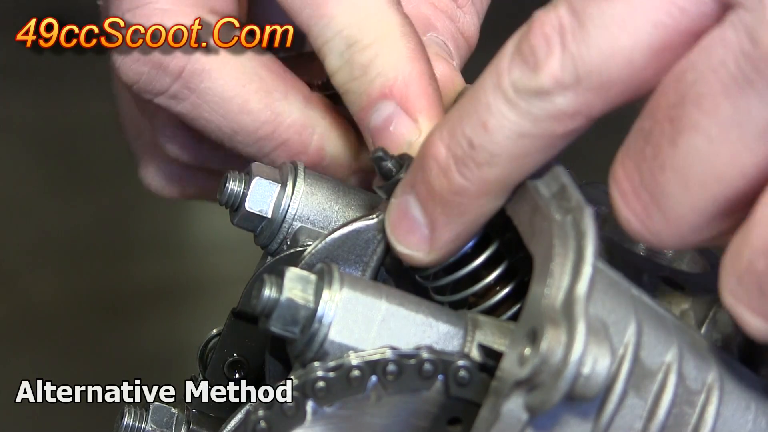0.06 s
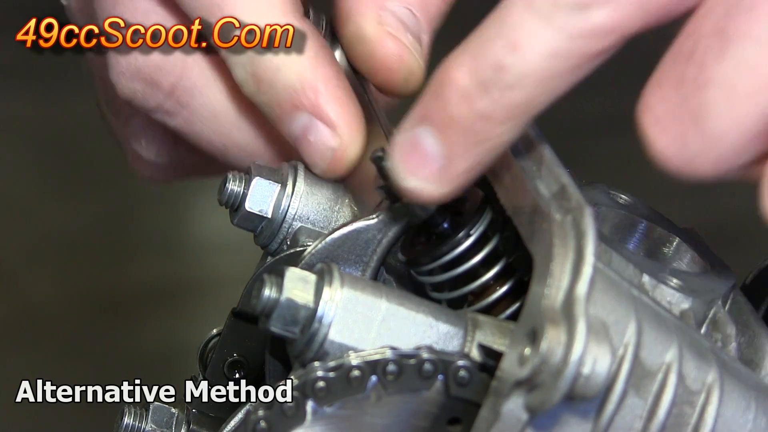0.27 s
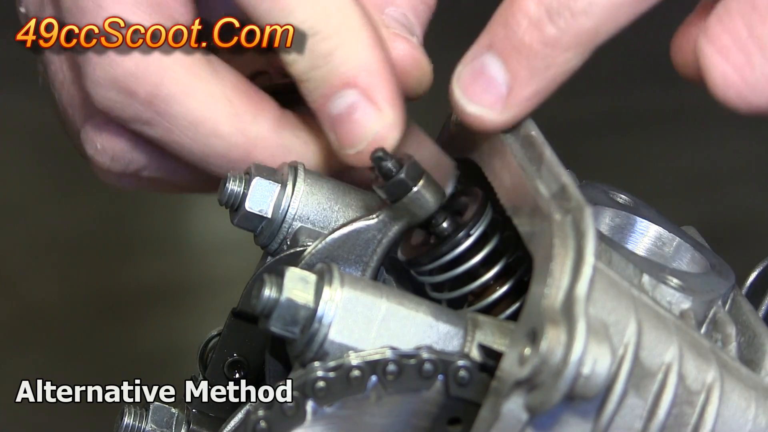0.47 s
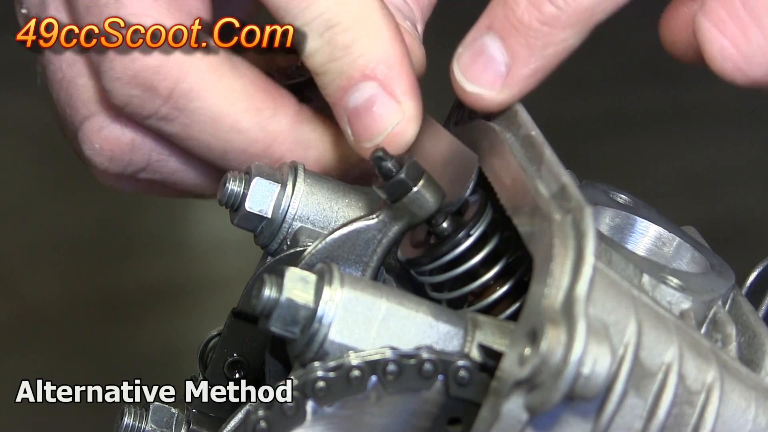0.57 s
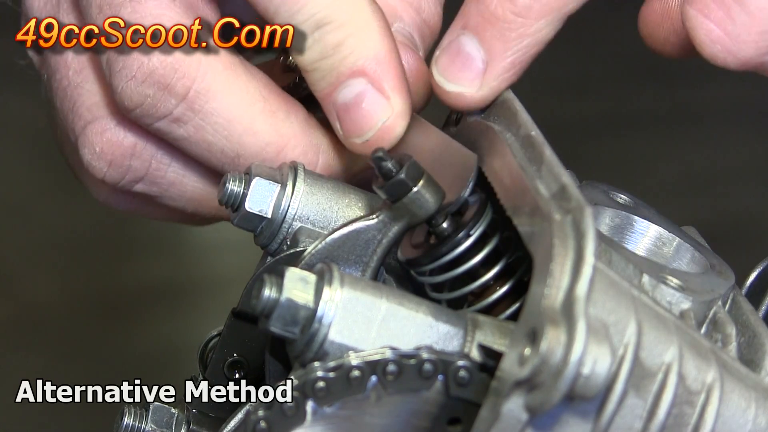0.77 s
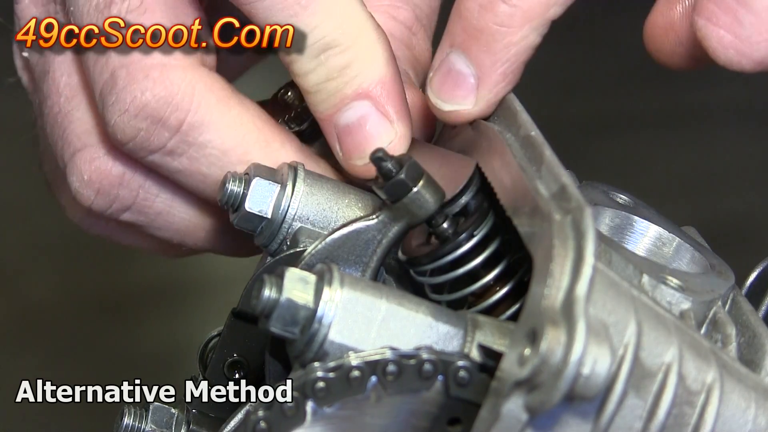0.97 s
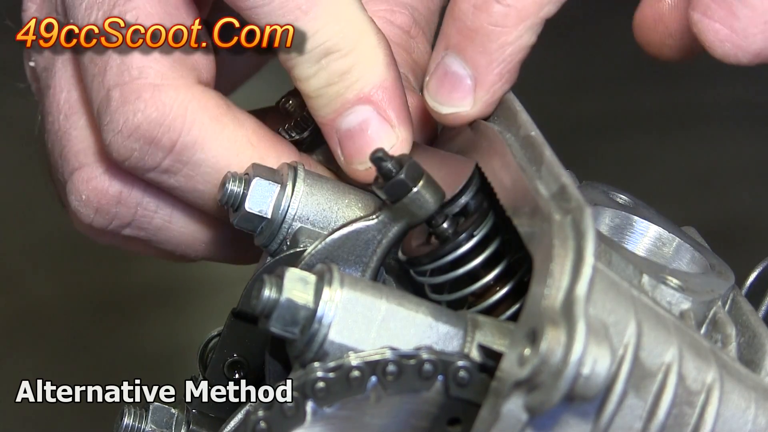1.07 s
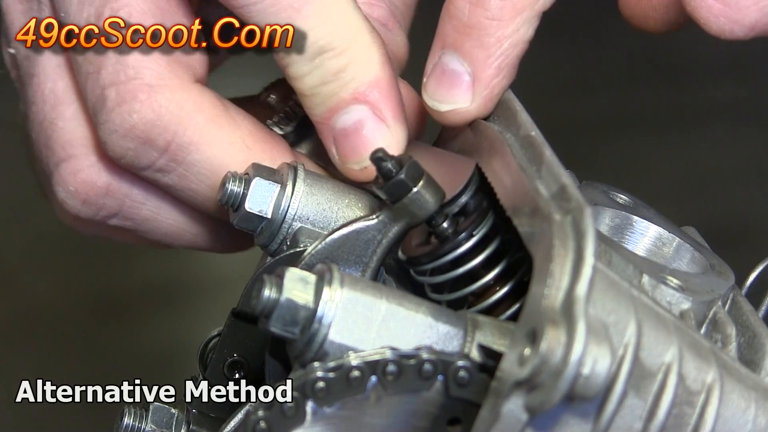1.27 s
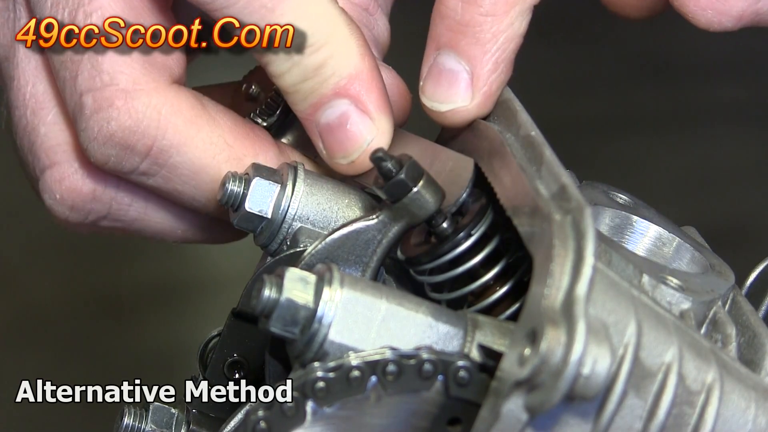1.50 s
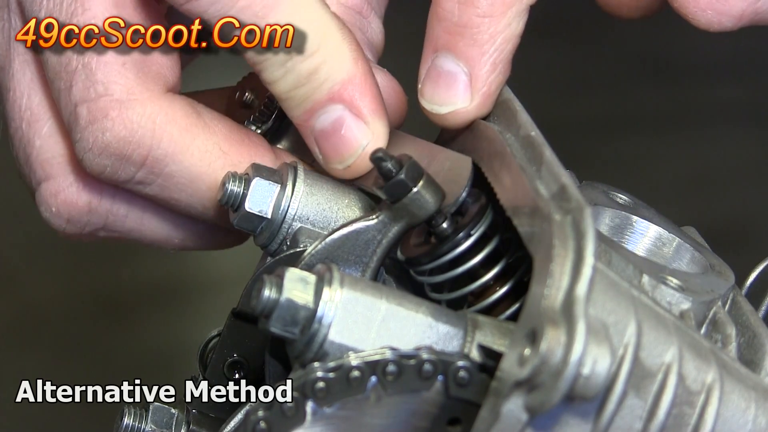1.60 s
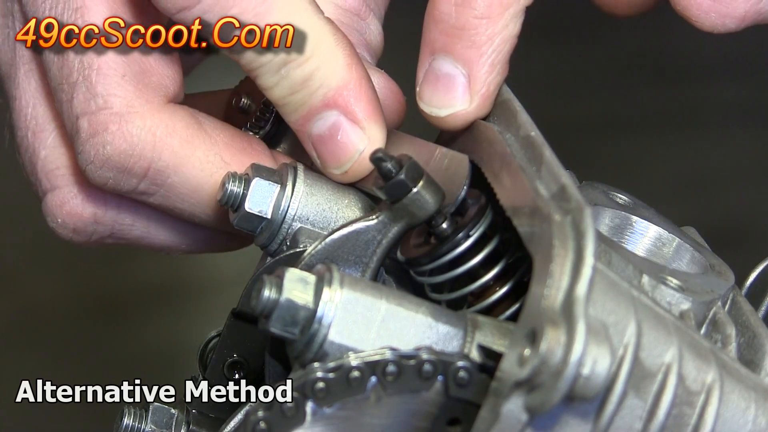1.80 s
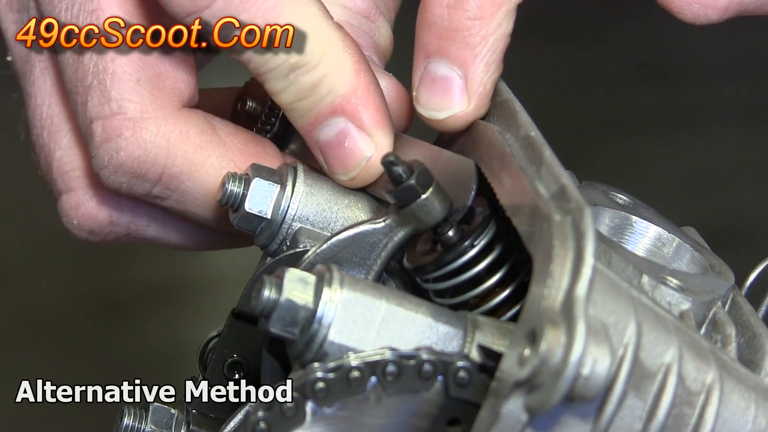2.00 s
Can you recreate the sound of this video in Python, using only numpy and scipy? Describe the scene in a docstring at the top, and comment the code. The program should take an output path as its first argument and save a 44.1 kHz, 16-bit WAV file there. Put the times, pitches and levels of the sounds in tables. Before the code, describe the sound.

Steel gauge blades click against a small engine's rocker arm: one loud clack early, faint scrapes and soft bench thuds, a light tick cluster, then a sharp bright click; close microphone, quiet room with low hum.

```python
"""Steel gauge blades click and scrape against the rocker arm of a small engine head in a quiet workshop.
Mains-fed motor hum (wavering tones) and air noise (shaped noise) run throughout. From 0.21 s come groups of
contacts, each a chatter of tiny slips that excites the modes of casting, head, rocker arm, valve stem, spring
cap and blade. Decaying tones ring on after some, and a diffuse noise tail of the room follows the contacts.
The valve spring twangs once at 0.225 s; the bench thuds softly, as decaying tones, from 0.255 to 0.625 s."""
import sys
import numpy as np
from scipy import signal
from scipy.io import wavfile
from scipy.ndimage import uniform_filter1d

SR = 44100
rng = np.random.default_rng(int(sys.argv[2]) if len(sys.argv) > 2 else 0)


def store_pcm(level_fs):
    """Save levels as 16-bit WAV."""
    pcm = np.round(np.clip(level_fs, -1, 1) * 32767).astype(np.int16)
    wavfile.write(sys.argv[1], SR, np.atleast_2d(pcm).T)


def volts_from_db(level):
    """Convert decibel levels to linear amplitude ratios."""
    exponent = np.asarray(level, float) / 20
    return 10 ** exponent


N = 90404  # samples


def read(points, hz):
    """Spectral interpolation: reads a table linearly along log frequency."""
    f, value = np.transpose(points)
    return np.interp(np.log(hz + 1), np.log(f + 1), value)


def add(mix, s, sound):
    """Linear superposition: adds a sound to the mix from time s on."""
    part = mix[round(s * SR):][:len(sound)]
    part += sound[:len(part)]


# Hum lines: f/Hz, level/dB
HUM_LINES = [(58.5, -64.5), (116, -66), (203, -76)]
# Bandwidth of the wavering of each line: width/Hz
HUM_WIDTHS = [3.8, 8.6, 24]


def hum():
    """Narrow-band modulation: each motor hum line is a steady tone with sidebands of narrow noise."""
    t = np.arange(N) / SR
    out = np.zeros(N)
    for (hz, db), width in zip(HUM_LINES, HUM_WIDTHS):
        pole = np.exp(-np.pi * width / SR)
        noise = rng.standard_normal(2 * N) + 1j * rng.standard_normal(2 * N)
        waver = signal.lfilter([1], [1, -2 * pole, pole * pole], noise)[N:]  # the filter has settled
        envelope = 1 + .5 * waver / np.sqrt(np.mean(abs(waver) ** 2))
        carrier = np.exp(2j * np.pi * (hz * t + rng.random()))
        out += volts_from_db(db) * np.sqrt(2) * (envelope * carrier).real
    return out


# Spectrum of the air noise: f/Hz, relative density level/dB per Hz
AIR_SPECTRUM = [(24, -41), (40, -12.5), (66, -5.5), (85, -27), (96, -7), (118, -4), (155, -11), (199, -6.5),
                (305, -11.5), (345, -9), (382, -12), (542, -10), (896, -16), (965, -16.5), (1040, -17.5),
                (1300, -16), (2320, -19), (9220, -31.5), (16000, -38.5)]
# Left-right correlation of the air noise: f/Hz, correlation/1
AIR_LIKENESS = [(60, 1), (180, 0.38), (550, 0.3), (1650, 0.77), (4970, 0.64), (15000, 0.164)]
AIR_DB = -57.5  # rms of the two channels together


def air():
    """Partial coherence: smooth room and microphone noise, alike in both channels only in part."""
    hz = np.fft.rfftfreq(2048, 1 / SR)
    a, b, c, d = rng.standard_normal((N // 512 + 6, 1025, 4)).T
    same = read(AIR_LIKENESS, hz)[:, None]
    left, other = a + 1j * b, c + 1j * d
    right = same * left + np.sqrt(1 - same ** 2) * other
    spectra = np.array([left, right]) * volts_from_db(read(AIR_SPECTRUM, hz))[:, None]
    out = signal.istft(spectra, nperseg=2048, noverlap=1536)[1][:, :N]
    return volts_from_db(AIR_DB) * out / out.std()


SLIPS_PER_S, SLIP_SPREAD_DB = 7900, 2  # mean rate, standard deviation of slip size
RISE = 0.23  # share of the contact length spent rising


def chatter(length):
    """Stick-slip excitation: randomly spaced tiny impulses under a rise and fall of pressure."""
    gaps, sizes = rng.exponential(1, 300), rng.standard_normal(300)
    signs = rng.choice([-1., 1.], 300)
    u = (np.cumsum(gaps) - gaps[0]) / SLIPS_PER_S / length  # time in contact lengths
    press = np.where(u < RISE, 0.096 + 0.81 * u / RISE, np.exp(-2.5 * (u - RISE)))
    forces = press * signs * volts_from_db(SLIP_SPREAD_DB * sizes)
    at = u * length * SR
    keep = at < 2399
    slips = np.zeros(2400)
    np.add.at(slips, at[keep].astype(int), forces[keep])
    return slips


SPOT_DB, SPOT_DETUNE = 2., .015  # scatter of mode level (dB) and pitch (share), as each contact lands elsewhere
PUSH_CYCLES = 0.58  # time constant of each mode's swing up, in cycles


def ring(modes, luck):
    """Modal superposition: damped sines, one row a mode; neighbours start in opposite directions."""
    t = np.arange(2600) / SR
    rows = []
    for k, ((hz, db, t60), (level_luck, pitch_luck)) in enumerate(zip(modes, luck)):
        decay = volts_from_db(db + SPOT_DB * level_luck - 60 * t / t60)
        swing_up = (1 - np.exp(-t * hz / PUSH_CYCLES)) ** 2
        tone = np.sin(2 * np.pi * hz * (1 + SPOT_DETUNE * pitch_luck) * t)
        rows.append((-1) ** k * decay * swing_up * tone)
    return np.array(rows)


def shake(slips, rows):
    """Forced vibration: the slips drive each mode, whose energy is then reset to that of its impulse response."""
    out = signal.fftconvolve(slips[None], rows, axes=1)
    share = np.linalg.norm(rows, axis=1) / np.linalg.norm(out, axis=1)
    return share @ out


# Modes of each struck part, before the scatter of ring(): f/Hz, relative level/dB, t60/s
CASTING_MODES = [(509, -4.5, .02), (665.5, -12.5, 0.021), (969, 0.5, 0.019), (1228, -2, 0.016),
                 (1674, 8.5, 0.0069)]
HEAD_MODES = [(2000, 3.5, 0.017), (2292, -4.5, 0.032), (2467, 2.5, .02), (2691, 2, 0.011),
              (3136, -1.5, 0.027)]
ROCKER_MODES = [(3240, -0.5, .01), (3875, -4.5, 0.012), (4470, 4.5, 0.0082), (4795, -3, 0.021),
                (5165, -2.5, 0.015)]
STEM_MODES = [(5554, -6, .01), (5890, 0.5, 0.01), (6517, 1.5, 0.012), (7230, -1, .01)]
CAP_MODES = [(7770, -0.84, 0.0083), (8270, -0.25, 0.0072), (8890, 0, 0.0079), (9580, -2, 0.0079)]
BLADE_MODES = [(10270, -0.5, 0.006), (11060, -1.5, 0.0067), (11550, -0.5, 0.0056), (12350, -2.5, 0.0035),
               (13550, -11, 0.0026), (15300, -21, 0.0033)]
ROOM_FEED_DAMP = 0.59  # ring time of the sound sent to the room, as a share of t60


def contact(length, *peaks_db):
    """Coupled excitation: one chatter rings every part.
    Returns that near sound and a smoother, shorter ringing of the same parts, without the chatter, for the room."""
    slips = chatter(length)
    parts = CASTING_MODES, HEAD_MODES, ROCKER_MODES, STEM_MODES, CAP_MODES, BLADE_MODES
    near, feed = 0, 0
    for db, modes, luck in zip(peaks_db, parts, rng.standard_normal((6, 6, 2))):
        part = shake(slips, ring(modes, luck))
        part = volts_from_db(db) * part / np.sqrt(uniform_filter1d(2 * part ** 2, 64).max())
        damped = [(hz, d, t60 * ROOM_FEED_DAMP) for hz, d, t60 in modes]
        smooth = ring(damped, 0 * luck).sum(0)  # no scatter
        near = near + part
        feed = feed + smooth * np.linalg.norm(part) / np.linalg.norm(smooth)  # equal energy
    return near, feed


# Contacts: t/s, chatter length/s, then the short-time peak level/dB of
# casting, head, rocker arm, valve stem, spring cap, blade
CONTACT_EVENTS = [(0.207, 0.003, -31, -18.5, -27.5, -25, -35, -48),
                  (0.2081, 0.0043, -25, -12, -20.5, -20.5, -18.5, -30.5),
                  (.2140, 0.003, -41, -23.5, -37.5, -31, -27, -34),
                  (.2352, .001, -54, -40, -34.5, -34, -38, -43),
                  (0.3124, 0.003, -38.5, -36, -43.5, -40.5, -40.5, -37),
                  (0.3175, 0.0058, -44, -34, -43, -49, -43, -38),
                  (.3280, 0.00195, -56, -48, -50, -46, -52, -46),
                  (0.363, 0.0034, -41.5, -49, -50.5, -52, -57, -56),
                  (0.5155, 0.0093, -35.5, -32.5, -45.5, -41, -50, -51),
                  (0.5227, 0.011, -36.5, -32, -39.5, -34, -51, -48),
                  (.5430, .0005, -45.5, -33, -38, -35, -32.5, -33.5),
                  (0.5901, 0.0071, -36, -37, -39, -47, -57, -58),
                  (0.6487, 0.0059, -38.5, -35, -39.5, -46, -53, -55),
                  (.6595, .003, -42, -47.5, -42, -37, -51, -51.5),
                  (0.9479, 0.0018, -32.5, -33, -33, -34, -38, -35.5),
                  (0.954, .003, -40.5, -38.5, -46, -40.5, -50, -45),
                  (0.966, 0.0017, -59, -56, -49.5, -43, -53, -47),
                  (0.9699, 0.0022, -42.5, -47, -34.5, -39.5, -44, -44),
                  (0.9844, 0.0012, -46.5, -45, -36.5, -24.5, -37, -32.5),
                  (1.0030, 0.00076, -40.5, -55, -35, -50, -48, -38),
                  (1.0050, .002, -59, -34, -31.5, -31, -36, -28.5),
                  (1.0130, 0.0014, -60, -33, -32, -25, -33, -36),
                  (1.3855, 0.0015, -54.5, -52.5, -63, -47.5, -59, -58),
                  (1.4578, 0.0021, -33, -29, -20, -20.5, -21.5, -15.5),
                  (1.4797, 0.0014, -40, -36, -32.5, -34, -38.5, -37.5),
                  (1.9097, 0.0013, -66, -66, -49, -62, -70, -68),
                  (1.9214, 0.0035, -45, -76, -71, -71, -72, -74)]


def contacts():
    """Superposition of transients: all contacts, as direct sound and as sound sent to the room."""
    clicks, sent = np.zeros((2, N))
    for s, length, *peaks_db in CONTACT_EVENTS:
        near, feed = contact(length, *peaks_db)
        add(clicks, s, near)
        add(sent, s + length / 2, feed)
    return clicks, sent


def ports(clicks):
    """Finite differences: slopes of the clicks, opposite at the two ports, make the treble differ."""
    width_db, treble_left_db = -14.5, -24  # the highest treble leans to the left port
    slope = np.gradient(clicks)
    side = volts_from_db(width_db) * slope - volts_from_db(treble_left_db) * np.gradient(slope)
    return clicks + np.array([side, -side])


def low_ring(hz, db, rise_s, t60):
    """Damped oscillation: a soft-starting tone that dies away exponentially."""
    t = np.arange(SR) / SR
    envelope = volts_from_db(db - 60 * t / t60) * (1 - np.exp(-t / rise_s)) ** 2
    return envelope * np.sin(2 * np.pi * (hz * t + rng.random()))


# Single tones of the metal: t/s, f/Hz, level/dB before the soft rise, t60/s
METAL_TONES = [(.52, 580, -51, .14), (.65, 420, -54, .14), (.952, 420, -49, .1), (1.004, 975, -49, .16),
               (1.462, 520, -48, .14), (1.46, 410, -51, .12), (1.921, 560, -49, .08), (.215, 1300, -50, .7),
               (.215, 1410, -50, .7), (.212, 2430, -47, .7), (.212, 2720, -50, .6), (.66, 5000, -50, .1),
               (1.014, 4480, -54, .3), (1.006, 3150, -42, .04), (1.014, 3150, -42, .04)]


def after_rings():
    """Free vibration: single modes of the metal ring on after some contacts."""
    out = np.zeros(N)
    for s, hz, db, t60 in METAL_TONES:
        add(out, s, low_ring(hz, db, .002, t60))  # rise time constant 2 ms
    return out


# Decay of the room: f/Hz, t60/s
ROOM_T60 = [(300, 0.94), (1000, 0.94), (1400, 0.72), (2300, 0.97), (5000, 0.71), (9000, 0.54),
            (12500, 0.31), (15500, .2)]
# Starting spectrum of the tail: f/Hz, relative level/dB
ROOM_SPECTRUM = [(300, 12.5), (1000, 6), (1400, 2), (1800, 7), (2300, 0), (3200, -1.5), (5000, 0),
                 (8000, 0), (10500, -3), (12500, 0), (15500, -1.5)]
ROOM_DB, ROOM_SAME, ROOM_START_S = -12, 0.91, .005  # gain, left-right correlation of the noise, onset


def room(sent):
    """Diffuse-field reverberation: a dense noise tail, each band dying at its own speed."""
    a, b = rng.standard_normal((2, SR))
    noise = np.array([a, ROOM_SAME * a + np.sqrt(1 - ROOM_SAME ** 2) * b])
    taps = noise * (np.arange(SR) > ROOM_START_S * SR)
    hz, t, z = signal.stft(taps, SR, nperseg=128)
    decay_db = read(ROOM_SPECTRUM, hz)[:, None] - 60 * t / read(ROOM_T60, hz)[:, None]
    tail = signal.istft(z * volts_from_db(decay_db), SR, nperseg=128)[1]
    tail = tail / np.linalg.norm(tail[0])
    return volts_from_db(ROOM_DB) * signal.fftconvolve(sent[None], tail, axes=1)[:, :N]


# Valve spring, one twang: t/s, f/Hz, level/dB before the soft rise, rise time constant/s, t60/s
SPRING_TWANG = (.225, 241, -48, .02, 1.5)


def spring():
    """Lightly damped resonance: the valve spring twangs once."""
    out = np.zeros(N)
    add(out, SPRING_TWANG[0], low_ring(*SPRING_TWANG[1:]))
    return out


# Bench thuds: t/s, f/Hz, level/dB before the soft rise, t60/s
BENCH_THUDS = [(.255, 216.3, -36, 0.1), (.335, 162, -44.5, 0.15), (.53, 168, -48.5, 0.21),
               (.625, 147, -46, .14)]


def thuds():
    """Heavily damped resonance: the bench thuds as soft, short low tones."""
    out = np.zeros(N)
    for s, hz, db, t60 in BENCH_THUDS:
        add(out, s, low_ring(hz, db, 0.0067, t60))  # rise time constant 6.7 ms
    return out


def scene():
    """Superposition of direct and diffuse fields: hum, air, near clicks, their room tail and low rings."""
    clicks, sent = contacts()
    near = hum() + ports(clicks) + after_rings() + spring() + thuds()
    both = near + room(sent) + air()
    return both * volts_from_db(np.array([[-.8], [0]]))  # channel gains in dB: left, right


def low_pass(x):
    """Removes everything above the highest recorded frequency."""
    return signal.sosfilt(signal.butter(12, 16640, fs=SR, output="sos"), x)


def record(dry):
    """High-pass filtering: the microphone's bass cut, fourth order at 56.6 Hz."""
    bass_cut = signal.butter(4, 56.6, "high", fs=SR, output="sos")
    mix = signal.sosfilt(bass_cut, dry)
    return low_pass(mix)


dry = scene()
out = record(dry)
store_pcm(out)
```